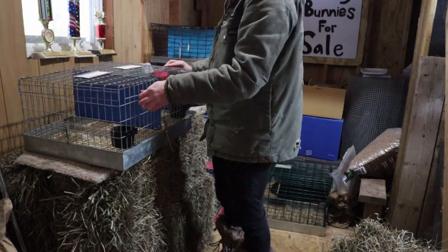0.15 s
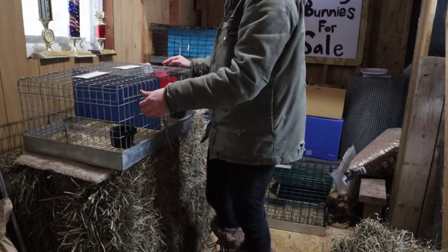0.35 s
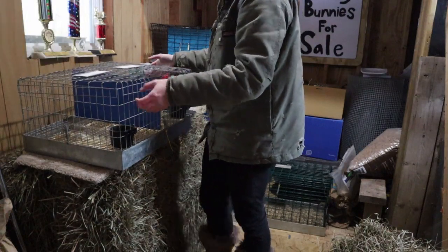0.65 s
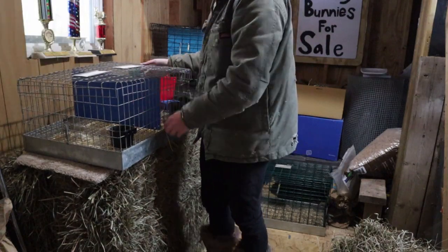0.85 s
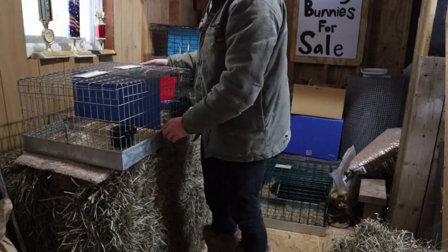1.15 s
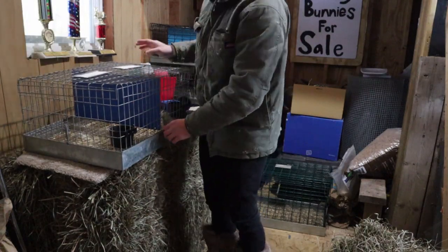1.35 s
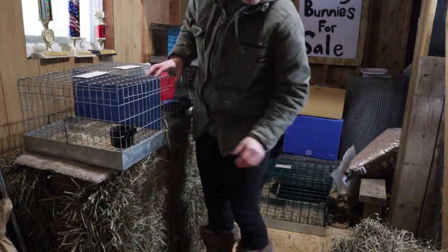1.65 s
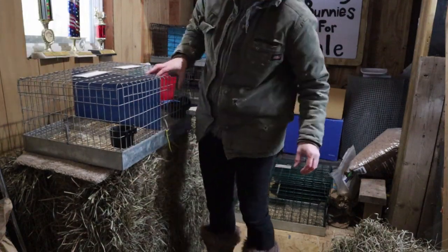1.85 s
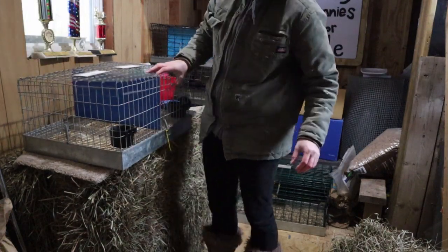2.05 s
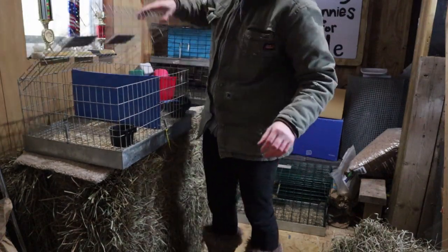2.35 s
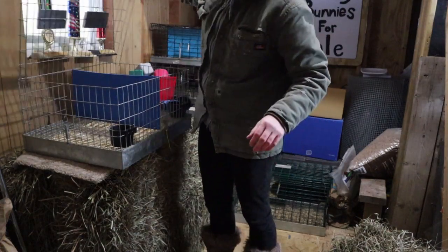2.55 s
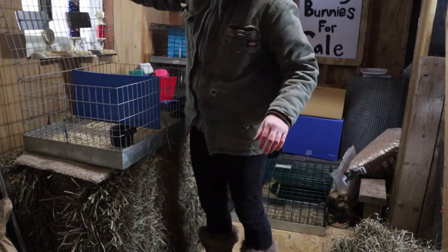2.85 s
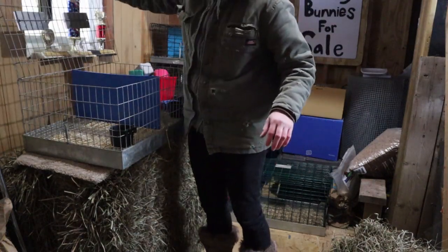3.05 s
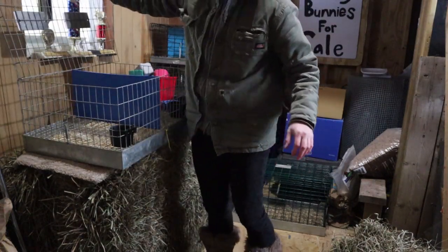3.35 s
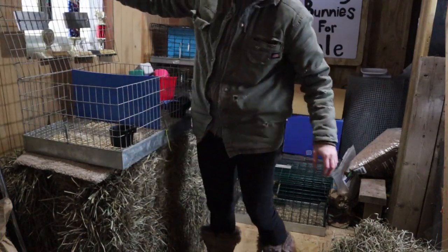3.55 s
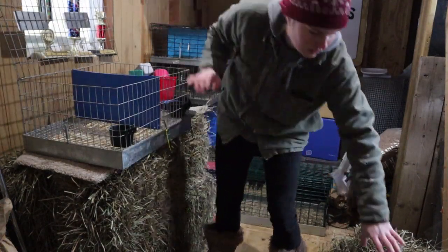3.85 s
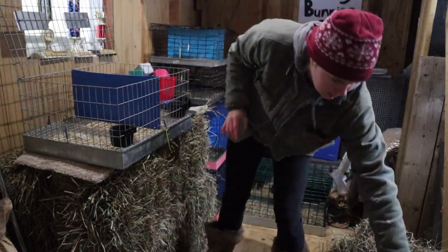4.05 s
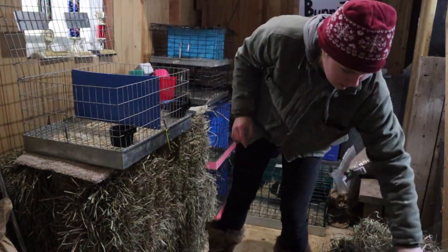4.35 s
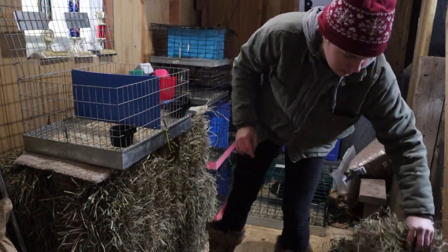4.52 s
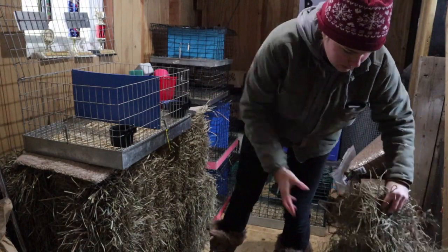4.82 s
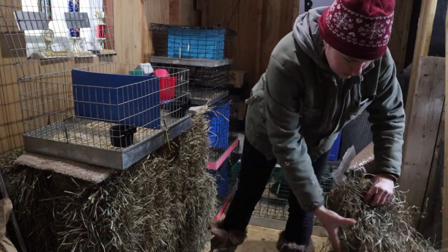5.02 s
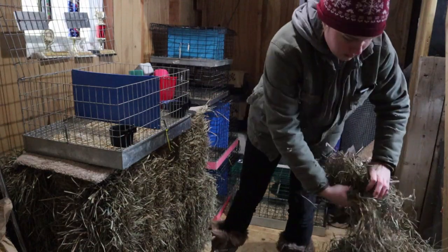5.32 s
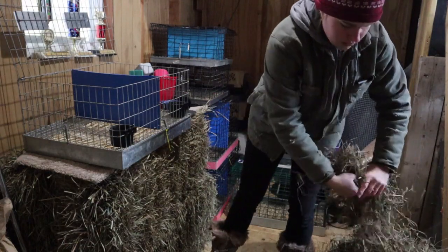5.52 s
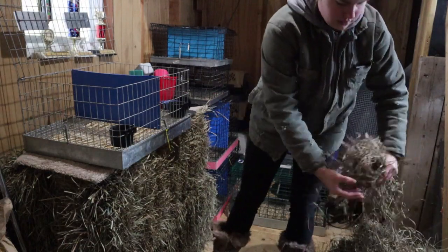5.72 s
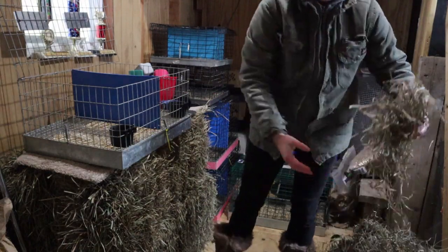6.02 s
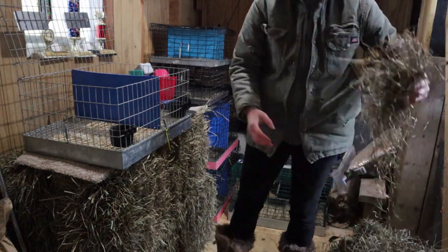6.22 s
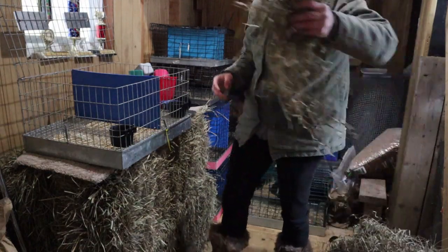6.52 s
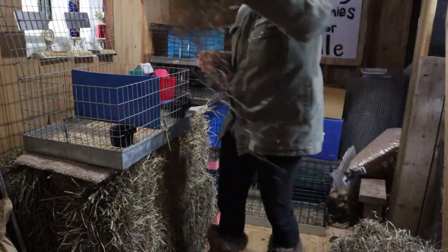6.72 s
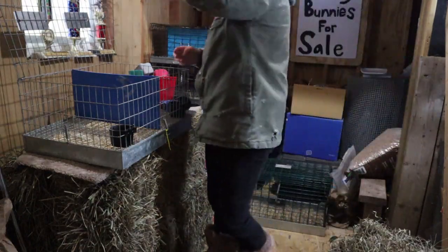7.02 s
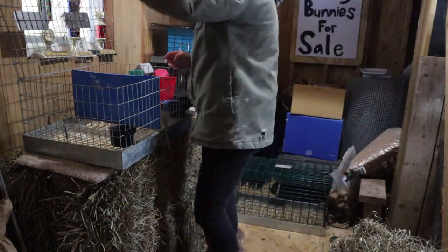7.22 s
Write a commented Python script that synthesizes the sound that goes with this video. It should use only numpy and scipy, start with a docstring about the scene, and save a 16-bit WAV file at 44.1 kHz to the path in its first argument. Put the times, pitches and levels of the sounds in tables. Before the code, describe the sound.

A close stereo microphone in a small wooden shed, over a quiet, low, steady hush. At about 0.1 s wire mesh clatters sharply and brightly, with a low knock beneath, dying by 0.4 s. Soft thuds and scuffy bumps come around 0.7 and 1.05 s, then near quiet. From 1.6 s a stiff coat stirs, wire clicks at 1.75 s with low steps, and light rattles cluster between 2.0 and 2.3 s as the lid lifts. At 3.0 s it slams on the planks: the loudest event, a hard woody bang with a wiry crash and brief ring. Small bounces follow at 3.1 to 3.6 s. Cloth and boots move at 3.8 s. From 4.15 s dry hay tears and crackles, crisp and dense, strongest until 4.9 s, dips near 5.1 s, resumes to 5.8 s, then fades. Faint stalk rustles, small scuffs and a dull step near 6.7 s finish it by 7.4 s.

```python
"""A wire cage lid is unlatched, rattled open and dropped against a wooden wall in a small shed, where
it bounces; boots shift on the boards, then hands tear an armful of dry hay from a heap and carry it over.
Wire, hay, cloth and scuffs are showers of tiny random snaps filtered by what they excite; the low thuds
and the wall are sums of dying modes. Sparse reflections and a steady hush surround them, and a small
stereo microphone hears pressure and the sideways flow, and widens the treble."""
import sys
import numpy as np
from scipy import signal
from scipy.fft import rfft, irfft, next_fast_len
from scipy.io import wavfile
from scipy.ndimage import uniform_filter1d

SR = 44100
rng = np.random.default_rng(int(sys.argv[2]) if len(sys.argv) > 2 else 0)


def unload_audio(sound):
    """Save the sound as a 16-bit wav file, at the path given as the first command line argument."""
    columns = np.transpose(np.atleast_2d(sound))
    # keep every value between -1 and 1, then stretch to whole-number steps
    steps = np.round(np.clip(columns, -1, 1) * 32767)
    wavfile.write(sys.argv[1], SR, steps.astype(np.int16))


def ratio_of_db(decibels):
    """Turn decibels (scalar or array-like) into linear amplitude factors; 0 dB maps to 1."""
    return 10 ** (np.asarray(decibels, float) / 20)


N = 325458  # length in samples


def evened(x):
    """Normalisation: scales a signal to rms 1."""
    return x / np.sqrt(np.mean(x ** 2) + 1e-20)


def read(points, hz):
    """Spectral envelope: interpolates a table along a log-frequency axis."""
    f, value = np.transpose(points)
    return np.interp(np.log(hz + 1), np.log(f + 1), value)


def octaves(hz):
    """Spectral tilt: octaves above 3 kHz, the middle of the rustle."""
    return np.log2(np.clip(hz, 200, 16000) / 3000)


def resonance(hz, centre_hz, width_hz):
    """Simple resonator: complex response of one damped mode, 1 at its centre."""
    return 1 / (1 + 2j * (hz - centre_hz) / width_hz)


def add(mix, s, sound):
    """Superposition: adds a sound to the mix from a time in seconds."""
    part = mix[:, round(s * SR):][:, :sound.shape[1]]
    part += sound[:, :part.shape[1]]


# Side of the snapping sources. Each row: time in seconds, signed likeness of flow to pressure (-1 to 1).
SIDE = [(3.9, 0.46), (4.1, -0.5), (6.3, -0.6), (6.6, 0.22)]


def side_at(t):
    """Direction of arrival: the likeness of sideways flow to pressure at a time."""
    return np.interp(t, *np.transpose(SIDE))


def crackle(size, per_s, spread_db, side):
    """Shot noise: snaps of uneven size reach pressure and sideways flow, partly alike by their side."""
    chance = rng.random(size)
    bigness = rng.exponential(1, size)
    shared, separate = rng.standard_normal((2, size))
    snaps = (chance < per_s / SR) * ratio_of_db(spread_db * np.minimum(bigness, 5))
    side = np.clip(side, -0.7, 0.7)  # the sources are wide, so never wholly alike
    flow = side * shared + np.sqrt(1 - side ** 2) * separate
    return evened(snaps * np.array([shared, flow]))


def burst(mix, s, strength_db, t60, rise, response, per_s):
    """Source and filter: a shower of contacts swells, dies away and sounds through a body."""
    t = np.arange(SR // 2) / SR
    swell = (1 - np.exp(-t / max(rise, 2e-4))) ** 2 * ratio_of_db(-60 * t / max(t60, .01))
    clump_s, clump_db = .006, 1.2  # contacts come in uneven clumps
    clumps = evened(uniform_filter1d(rng.standard_normal(len(t)), size=round(clump_s * SR)))
    shower = crackle(len(t), per_s, 1.93, side_at(s))
    shower = shower * swell / swell.max() * ratio_of_db(clump_db * clumps)
    gain = response(np.fft.rfftfreq(len(t), 1 / SR))
    gain = gain / np.sqrt(np.mean(abs(gain) ** 2))
    sound = irfft(rfft(shower) * gain, len(t))
    # the first contacts come a little before the knock is felt
    add(mix, s - 1.5 * rise, ratio_of_db(strength_db - 8) * sound)


# Wires knocking or dragging together. Each row: time in seconds, relative strength in dB,
# brightness in dB per octave, rise constant in seconds, dB added to the ring of the thinnest wires.
RATTLES = [(0.068, -32.5, -1, .012, 0), (0.1, -22.5, 0.5, .018, 3), (0.118, -7.5, 2, .003, 1.5),
           (0.169, -24.5, -1.5, 0.005, -2), (0.239, -26, -1, 0.0061, 0), (0.53, -44.5, 0.5, .008, 11),
           (1.603, -41, -3, 0.005, -5), (1.738, -22, 1, .004, -3), (1.789, -28.5, -3.5, 0.005, 0),
           (1.999, -26, -1, 0.0061, -2), (2.049, -32, -8.5, 0.0051, 0), (2.152, -30, -1, .016, 0),
           (2.219, -27, -2, 0.003, 2), (2.243, -25, -1.5, 0.0039, 0), (2.272, -28, 1.5, .009, 4),
           (2.295, -25.5, 0, 0.006, 4), (2.47, -48, 1.5, 0.02, 11), (2.6, -48, 2.5, .02, 13),
           (7.32, -46, -4, 0.025, -5)]
# Modes of the wire mesh. Each row: centre in Hz, width in Hz, relative strength in dB.
WIRE_MODES = [(534, 55, -2.5), (640, 230, -9), (1084, 51, 3), (1536, 200, -11.5), (1950, 210, -17.5),
              (4340, 120, -17), (5670, 100, -13.5)]
# Dry clatter of wire on wire. Each row: frequency in Hz, relative level in dB.
WIRE_COLOUR = [(150, -53), (250, -2), (536, -15), (785, -4), (1070, 0.5), (1320, -5), (3550, -9),
               (5670, -11), (11800, -12), (15800, -58)]


def rattles():
    """Modal excitation: every knock is a dry clatter plus the ringing modes of the wire mesh."""
    out = np.zeros((2, N))
    thin_wires_hz, mesh_ring_gain = 5000, 2.97
    pitch_spread, uneven_db = .008, 1.4  # no two knocks find the mesh alike
    chance = rng.standard_normal((len(RATTLES), 2, len(WIRE_MODES)))
    for (s, strength_db, tilt_db, rise, thin_db), (slack, uneven) in zip(RATTLES, chance):
        # 0.26 s at -30 dB, shorter for harder knocks
        t60 = 0.26 * (1 - 0.0048 * (strength_db + 30))

        def mesh(hz):
            """Modal sum: clatter and ringing wires, tilted by the brightness of the knock."""
            ringing = 0
            for (f, width, db), u, v in zip(WIRE_MODES, uneven, slack):
                mode_db = db + uneven_db * u + thin_db * (f > thin_wires_hz)
                ringing = ringing + ratio_of_db(mode_db) * resonance(hz, f * (1 + pitch_spread * v), width)
            clatter = ratio_of_db(read(WIRE_COLOUR, hz))
            return ratio_of_db(tilt_db * octaves(hz)) * (clatter + mesh_ring_gain * ringing)

        burst(out, s, strength_db, t60, rise, mesh, per_s=20000)
    return out


SLAM_S = 2.9903  # the lid meets the wall, seconds
# The lid crashes at once, then shudders against the planks. Each row: seconds after the blow,
# relative strength in dB, brightness in dB per octave, t60 in seconds, rise constant in seconds.
SHUDDERS = [(-.001, -9, -0.6, 0.11, 0.00025), (.014, -16.5, 2.5, 0.18, .007)]
# The whole lid shuddering. Each row: frequency in Hz, relative level in dB.
CRASH_COLOUR = [(90, -25), (300, -1), (700, -2.5), (1250, -3), (3000, -16), (6000, -20.5), (11000, -29),
                (13000, -46)]
# A wire left free to sing. One row: centre in Hz, width in Hz, dB over the crash.
LID_RING = (2500, 28, 5)


def slam():
    """Impact excitation: the dropped lid shudders broadly while one free wire resonates."""
    out = np.zeros((2, N))
    ring_hz, width_hz, ring_db = LID_RING
    for after, strength_db, tilt_db, t60, rise in SHUDDERS:

        def lid(hz):
            """Parallel paths: broad crash plus one resonance."""
            crash = ratio_of_db(read(CRASH_COLOUR, hz) + tilt_db * octaves(hz))
            return crash * (1 + ratio_of_db(ring_db) * resonance(hz, ring_hz, width_hz))

        burst(out, SLAM_S + after, strength_db, t60, rise, lid, per_s=18000)
    return out


def rustle(rows, colour, per_s, spread_db, patchy_db):
    """Filtered shot noise: dense snaps in clumps of pitch and time, their tilt changing with time."""
    s, level_db, tilt_db = np.transpose(rows)
    snaps = crackle(N, per_s, spread_db, side_at(np.arange(N) / SR))
    hz, t, z = signal.stft(snaps, SR, nperseg=256, noverlap=192)
    clumps = rng.standard_normal((len(t), len(hz))).T
    clumps = uniform_filter1d(clumps, size=8, axis=0)
    clumps = evened(uniform_filter1d(clumps, size=30, axis=1))
    tilt = octaves(hz)[:, None] * np.interp(t, s, tilt_db)
    shape = ratio_of_db(read(colour, hz)[:, None] + tilt)
    shape /= np.sqrt(np.mean(shape ** 2, axis=0))  # tilt alters colour, not level
    level = ratio_of_db(np.interp(t, s, level_db, left=-120, right=-120) + patchy_db * clumps)
    return signal.istft(z * shape * level, SR, nperseg=256, noverlap=192)[1][:, :N]


# Hands in the hay. Each row: time in seconds, effort in dB.
HAY = [(4.08, -77), (4.13, -47), (4.19, -33), (4.26, -34.5), (4.4, -30.5), (4.6, -29.5), (4.74, -32),
       (4.86, -31.5), (4.95, -36.5), (5.08, -39.5), (5.3, -33.5), (5.5, -36), (5.65, -33), (5.81, -36),
       (5.93, -45), (6.08, -49), (6.17, -47.5), (6.28, -52), (6.62, -53), (7.05, -55.5), (7.38, -55)]
# Colour of dry stalks as the microphone hears them, with its peak near 11 kHz.
# Each row: frequency in Hz, relative level in dB.
STALK_COLOUR = [(180, -40), (300, -7.5), (365, -6), (560, -3.5), (1250, -3.5), (2940, -1.5), (8700, -6),
                (10900, -1), (15200, -16.5)]
# Brightness of the hay. One row: dB per octave at -30 dB of effort, change in it per dB of effort.
HAY_BRIGHT = (1.94, 0.065)


def hay():
    """Effort-dependent spectrum: snapping stalks brighten as the grip tightens."""
    top_db, per_db = HAY_BRIGHT
    grip = [(s, db, top_db + per_db * (db + 30)) for s, db in HAY]
    return rustle(grip, STALK_COLOUR, per_s=27000, spread_db=1.1, patchy_db=1.16)


# A stiff coat and loose stalks. Each row: time in seconds, effort in dB, brightness in dB per octave.
COAT = [(0, -52, -7), (.45, -70, 6), (.95, -74, -16), (1.4, -70, -3.5), (1.68, -51.5, 1.5),
        (1.95, -56, 2.5), (2.4, -53.5, 5), (2.7, -59, 4.5), (2.9, -64.5, 2.5), (3.4, -75, -8),
        (3.72, -54.5, 2.5), (3.85, -52.5, 0.5), (4.1, -55, 2)]
# Colour of the cloth. Each row: frequency in Hz, relative level in dB.
COAT_COLOUR = [(410, -30), (700, 3.5), (1090, -6.5), (1960, -6.5), (2160, -9), (10500, -23.5), (14000, -33)]


def coat():
    """Friction noise: a stiff coat and loose stalks stir as sparser, patchier snaps."""
    return rustle(COAT, COAT_COLOUR, per_s=15000, spread_db=1.5, patchy_db=2.0)


# Bumps of latch, hands, boots and bouncing lid, and stalks snapping. Each row: time in seconds,
# relative strength in dB, brightness in dB per octave, hollow in Hz, t60 in seconds.
SCUFFS = [(0.715, -35.5, -3, 1600, 0.11), (.89, -43.5, -3, 1070, 0.33), (.95, -37, -5, 800, 0.045),
          (1.029, -39, -8, 2400, 0.103), (1.046, -31.5, -1.5, 1500, 0.15), (1.055, -26.5, -5.5, 1950, .12),
          (1.085, -37, -5, 2000, 0.16), (1.052, -35.5, -10, 530, 0.209), (1.228, -42, -3, 1700, 0.25),
          (2.64, -41, -4.5, 510, 0.29), (3.122, -35.5, -7, 520, .2), (3.473, -32, -5.5, 640, 0.21),
          (3.612, -44, -3.5, 640, 0.17), (3.778, -37.5, 2.5, 1200, .14), (4.103, -33.5, -4.5, 1890, .6),
          (6.262, -39, -3, 810, 0.19), (6.333, -32, -1.5, 7400, .05), (6.49, -43.5, -9, 830, 0.39),
          (6.691, -34, -4.5, 1000, .11), (6.81, -38, -5.5, 1110, .1), (7.089, -36.5, 0, 5000, .2)]


def scuffs():
    """Cavity resonance: short grating showers, each with one broad hollow from the thing bumped."""
    out = np.zeros((2, N))
    for s, strength_db, tilt_db, body_hz, t60 in SCUFFS:

        def grit(hz):
            """Resonant filtering: dull bumps are the most hollow."""
            width_hz = 0.2 * body_hz * (body_hz / 600) ** 0.52
            hollow = ratio_of_db(3.0 - 1.9 * tilt_db) * resonance(hz, body_hz, width_hz)
            return ratio_of_db(read(STALK_COLOUR, hz) + tilt_db * octaves(hz)) * (1 + hollow)

        # a longer contact swells more slowly
        burst(out, s, strength_db, t60, .02 * t60, grit, per_s=20000)
    return out


def ring(hz, t60, rise):
    """Damped oscillation: one dying mode with a soft start; the wood first gives way from the air."""
    t = np.arange(SR) / SR
    decay = ratio_of_db(-60 * t / max(t60, .02))
    return -np.sin(2 * np.pi * hz * t) * decay * (1 - np.exp(-t / rise))


# Low thuds of steps and of the lid's bounce. Each row: time in seconds, relative strength in dB,
# pitch in Hz, t60 in seconds.
THUDS = [(0.119, -25.5, 183, 0.18), (0.15, -26.5, 159, 0.2), (0.16, -37.5, 83.4, 0.28),
         (0.714, -26, 157, 0.14), (0.739, -31.5, 194, 0.11), (.75, -38.5, 81, .35),
         (1.739, -35, 155.6, 0.3), (1.78, -32, 77, 0.3), (1.815, -24.5, 83.4, 0.2),
         (1.917, -24.5, 73.4, 0.1), (2.219, -37.5, 154, 0.32), (2.65, -37, 188, 0.17),
         (3.12, -26, 172.7, 0.35), (3.249, -36.5, 106, 0.22), (3.607, -40, 79, 0.3),
         (3.781, -31, 71.6, 0.28), (3.873, -28, 94, 0.2), (4.198, -28.5, 90, 0.1),
         (4.388, -31.5, 168, 0.18), (6.7, -24, 84, 0.3), (6.817, -36, 153, 0.1), (6.919, -34, 88.4, 0.22)]
# Planks struck by the lid. Each row: frequency in Hz, relative strength in dB, t60 in seconds.
WALL = [(90.7, -22, 0.76), (128.5, 2, 0.24), (154.4, 2.5, 0.19), (188.3, 2.5, 0.15), (247.4, -9.5, 0.32),
        (291, 3, 0.2), (358, -15, 0.34), (496, -8.5, 0.23), (635, -12.5, 0.15)]


def boards():
    """Modal synthesis: steps and the lid's bounce ring wood and its overtones; the slam rings the wall."""
    out = np.zeros((1, N))
    for s, strength_db, hz, t60 in THUDS:
        thud = ring(hz, t60, 0.16 / hz)
        thud += 0.37 * ring(1.562 * hz, 0.67 * t60, 0.0067)
        thud += 0.42 * ring(1.745 * hz, 0.39 * t60, 0.0018)
        add(out, s, ratio_of_db(strength_db) * thud[None])
    wall = sum(ratio_of_db(db) * ring(hz, t60, 0.0045) for hz, db, t60 in WALL)
    add(out, SLAM_S, ratio_of_db(-10) * wall[None])
    return out * [[1], [.08]]  # heard mostly as pressure


# Decay of the shed. Each row: frequency in Hz, t60 in seconds.
SHED_T60 = [(100, 0.96), (400, 0.48), (1500, 0.29), (5000, 0.26), (12000, 0.16)]


def shed(x):
    """Reverberation: three sets of sparse reflections, dying by band, fade in and out in steady rotation."""
    taps = np.zeros((6, SR))
    at = np.arange(200, SR - 20, 20) + rng.integers(0, 20, (6, (SR - 201) // 20))
    np.put_along_axis(taps, at, rng.choice([-1., 1.], at.shape), axis=1)
    hz, t, z = signal.stft(taps, SR, nperseg=256)
    decay = ratio_of_db(-60 * t / read(SHED_T60, hz)[:, None])
    tails = signal.istft(z * decay, SR, nperseg=256)[1]
    tails /= np.linalg.norm(tails, axis=1, keepdims=True)
    # 1.3 cycles per second, a third of a cycle apart
    turn = 2 * np.pi * (1.3 * np.arange(N) / SR + np.arange(3)[:, None] / 3)
    feeds = np.sqrt(2 / 3) * np.cos(turn) * x[0]
    feeds = np.repeat(feeds, 2, axis=0)  # each reaches pressure and flow
    echoes = signal.oaconvolve(feeds, tails[:, :SR // 2], axes=1)[:, :N]
    return echoes.reshape(3, 2, N).sum(0)


# Spectrum of the still air. Each row: frequency in Hz, relative level in dB.
AIR_COLOUR = [(16, -30), (28, -4), (42, 1.5), (70, -4.5), (176, -3), (268, -8), (509, -8.5), (774, -14.5),
              (1080, -13.5), (8540, -35), (11900, -33.5), (13300, -55), (15800, -74)]


def air():
    """Stationary noise: the shed's steady hush, swelling a little."""
    hz, t, z = signal.stft(rng.standard_normal((2, N)), SR, nperseg=2048)
    patches = rng.standard_normal((len(t), len(hz))).T
    patches = uniform_filter1d(patches, size=12, axis=0)
    patches = evened(uniform_filter1d(patches, size=5, axis=1))
    z *= ratio_of_db(read(AIR_COLOUR, hz)[:, None] + 0.45 * patches)
    return ratio_of_db(-50.5) * evened(signal.istft(z, SR, nperseg=2048)[1][:, :N])


def scene():
    """Superposition: pressure and sideways flow of all sources, with the shed's reflections and air."""
    near = hay() + coat() + rattles() + slam() + scuffs()
    low = boards()
    # the boards carry their own tail, so they feed the shed less
    pressure, flow = near + low + ratio_of_db(-8.5) * shed(near + ratio_of_db(-10.0) * low)
    # below 800 Hz, sounds from in front reach both ports alike
    flow = signal.lfilter(*signal.butter(1, 800, "high", fs=SR), flow)
    return np.array([pressure, flow]) + air()


# Gain of the sideways flow against the pressure. Each row: frequency in Hz, gain in dB.
WIDTH = [(30, -30), (60, -12), (125, -9.5), (250, 0.5), (500, -1), (1000, 0), (2400, 3.5), (4400, 5),
         (8000, 8.5), (14000, 6.5)]


def stereo_microphone(dry):
    """Sum and difference: flow, advanced by 1.27 radians, is added to and taken from the pressure."""
    size = next_fast_len(N)
    hz = np.fft.rfftfreq(size, 1 / SR)
    turned = rfft(dry[1], size) * ratio_of_db(read(WIDTH, hz)) * np.exp(1.27j)
    side = irfft(turned, size)[:N]
    return np.array([dry[0] + side, dry[0] - side])


def band_limit(x):
    """A steep low-pass at the top of the band."""
    return signal.sosfilt(signal.butter(12, 15930, fs=SR, output="sos"), x)


def record(dry):
    """Saturation: the stereo pair passes a preamp that rounds off the highest peaks."""
    pair = stereo_microphone(dry)
    rounded = pair / (1 + abs(pair) ** 4) ** (1 / 4)
    return band_limit(rounded)


dry = scene()
out = record(dry)
unload_audio(out)
```